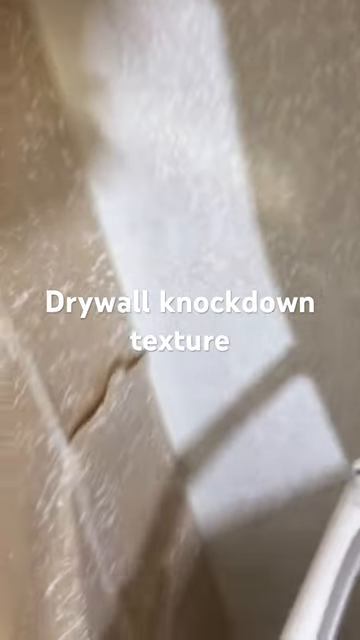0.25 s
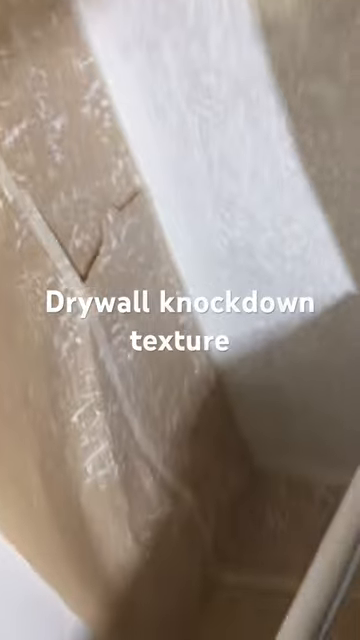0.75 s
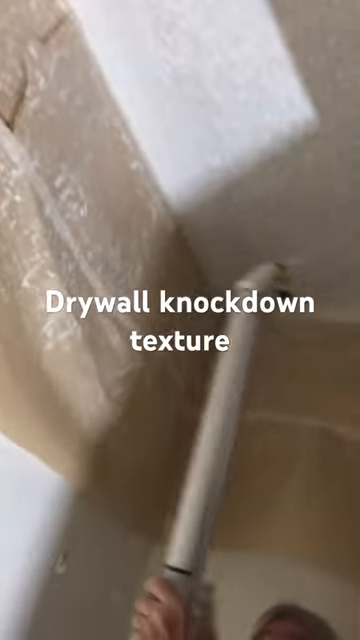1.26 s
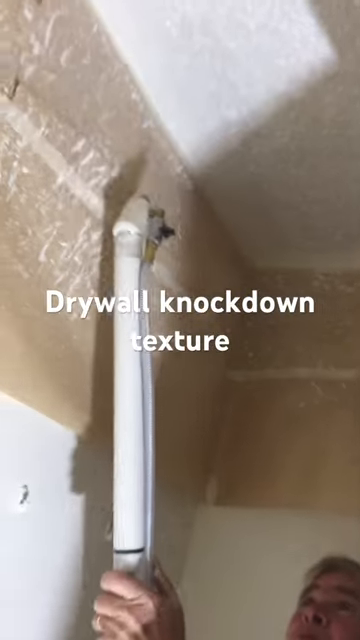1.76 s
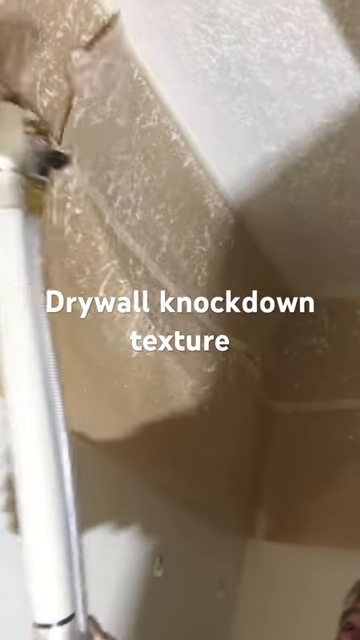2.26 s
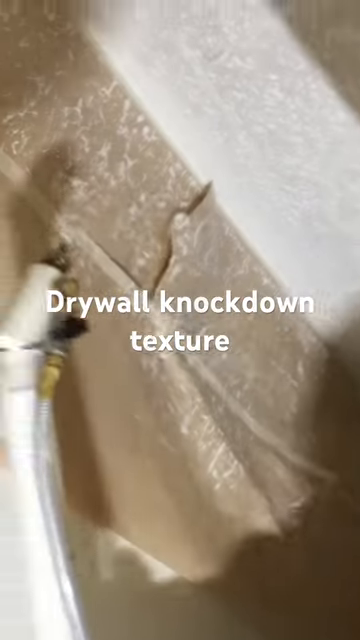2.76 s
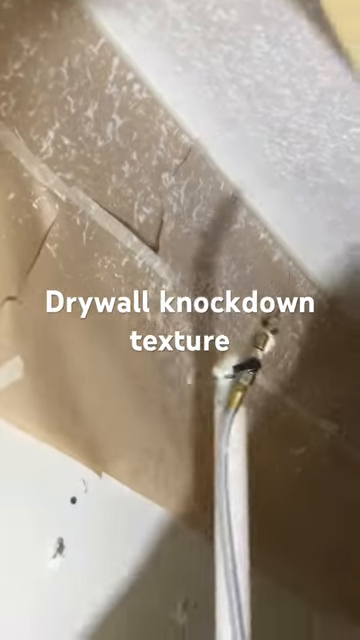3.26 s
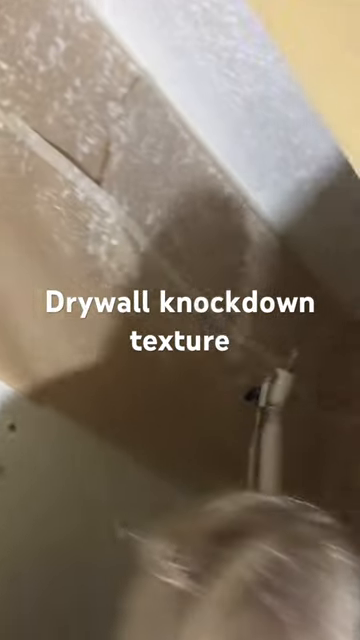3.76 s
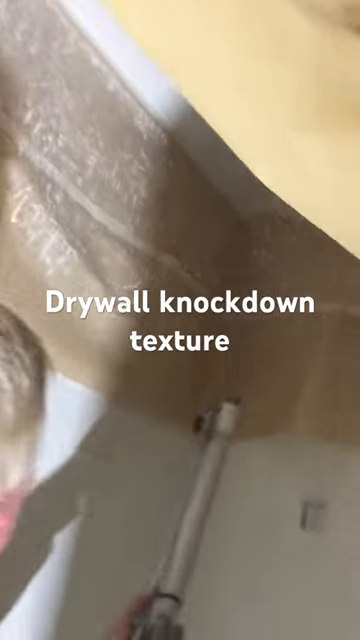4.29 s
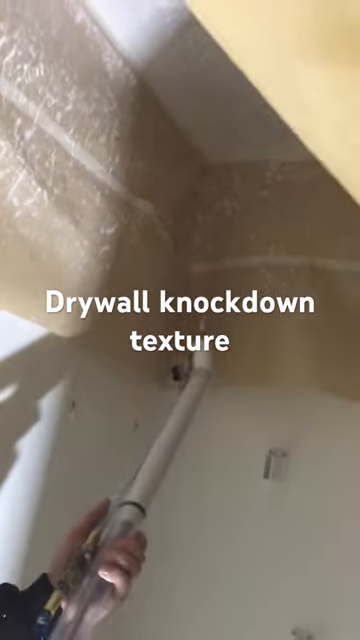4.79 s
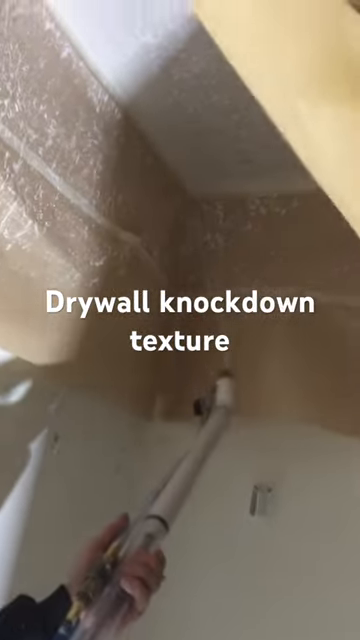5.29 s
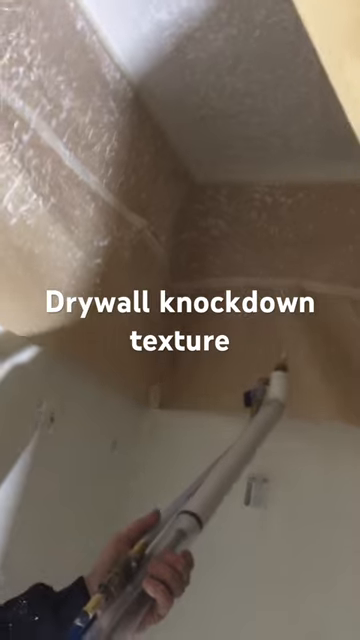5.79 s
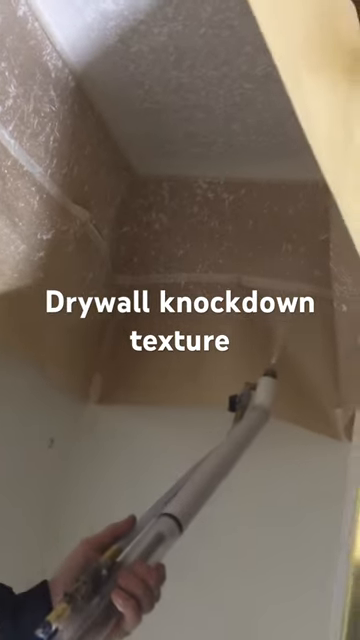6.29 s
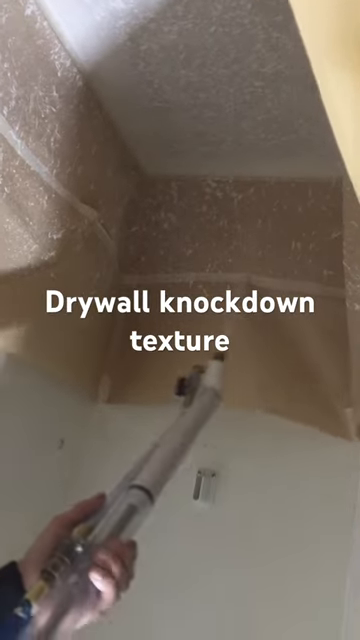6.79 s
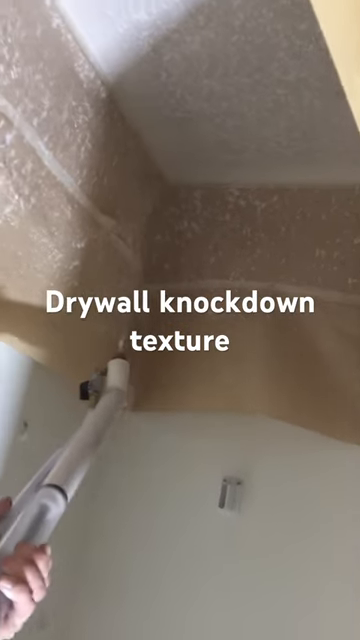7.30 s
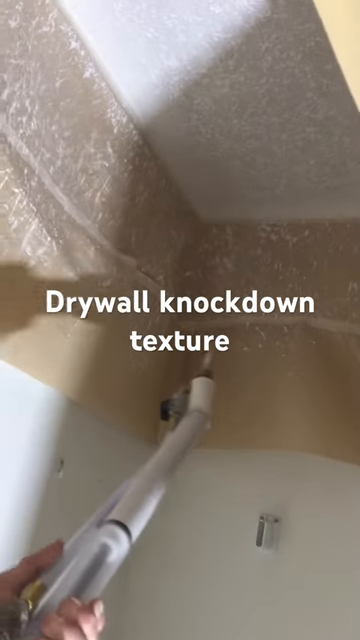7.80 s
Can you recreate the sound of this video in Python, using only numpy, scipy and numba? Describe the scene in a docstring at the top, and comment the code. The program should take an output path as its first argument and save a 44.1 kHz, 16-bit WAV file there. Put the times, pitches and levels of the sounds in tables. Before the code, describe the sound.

A compressed-air texture gun sprays without a break in a small bare room: bright hiss, midrange roar and thin wavering whistles, all fluttering quickly. Mud droplets splatter on the ceiling and patter on masking paper, lighter in the middle, then drumming and booming more in the last part. One dull bump and one sharp slap stand out slightly. Close handheld microphone, mono.

```python
"""A compressed-air texture gun sprays drywall mud on a ceiling edged with masking paper, in a bare room.
Filtered noise makes the jet: hiss, roar, whistle and wandering tones flutter as mud feeds in, with spits and a hoot.
Random impacts make the droplets that splatter on the ceiling and drum on the paper, which flaps in the blast;
lumps slap it and the wand bumps the ceiling, as fading modes with noise. Drifting sines over a dull rumble
make a far compressor. The mix is mono, alike in both channels."""
import sys
import numpy as np
from scipy import signal
from scipy.fft import rfft, irfft, next_fast_len
from scipy.io import wavfile
from scipy.ndimage import uniform_filter1d, map_coordinates
from numba import njit

SR = 44100
rng = np.random.default_rng(int(sys.argv[2]) if len(sys.argv) > 2 else 0)


def int16_out(signal):
    """Quantize to a 16-bit WAV file."""
    q = np.round(np.clip(np.atleast_2d(signal).T, -1, 1) * 32767)
    wavfile.write(sys.argv[1], SR, q.astype(np.int16))


N = 355005
TIME = np.arange(N) / SR
FREQ = np.maximum(np.arange(N // 2 + 1) * SR / N, 1)  # kept above zero for the logarithm


def undb(db):
    """Decibels to gain."""
    return 10 ** (np.asarray(db) / 20)


def unit(x):
    """Scale to an rms of one."""
    return x / np.sqrt(np.mean(x ** 2))


def curves(table):
    """The columns of a control table, joined by straight lines in time."""
    times, *columns = np.transpose(table)
    return [np.interp(TIME, times, column) for column in columns]


def slope(points):
    """Gain per frequency from (f/Hz, gain/dB) points, joined over log frequency."""
    hz, db = np.transpose(points)
    return undb(np.interp(np.log(FREQ), np.log(hz), db))


def bell(hz, width, freq=FREQ):
    """A bell over frequency that falls to one half at the edges of its width."""
    return .5 ** ((2 * (freq - hz) / width) ** 2)


def ripple(modes):
    """Gain of peaks and dips laid over a broad spectrum."""
    return undb(sum(db * bell(hz, width) for hz, width, db in modes))


def resonances(modes):
    """Gain of resonances that stand alone; their powers add."""
    return np.sqrt(sum(undb(db) ** 2 * bell(hz, width) for hz, width, db in modes))


def colour(x, gain):
    """Filter by a gain per frequency; rms one."""
    size = next_fast_len(N, real=True)
    bins_hz = np.arange(size // 2 + 1) * SR / size
    spectrum = rfft(x, size) * np.interp(bins_hz, FREQ, gain)
    return unit(irfft(spectrum, size)[:N])


def noise(gain):
    """Coloured turbulence noise; rms one."""
    return colour(rng.standard_normal(N), gain)


def walk(rate):
    """Smooth chance that changes about rate times a second; rms one."""
    steps = rng.standard_normal(4096)
    path = np.interp(TIME * rate, np.arange(len(steps)), steps)
    return unit(uniform_filter1d(path, max(int(SR / rate / 2), 1)))


def swell(s, length):
    """A rounded burst around time s, half as high at the edges of its length."""
    return np.interp(TIME, s + length * np.linspace(-1, 1, num=17), np.hanning(17))


def drops(per_s, spread_db):
    """Random impacts; a wider spread makes a few of them much larger than the rest."""
    hit = rng.random(N) < per_s / SR
    boost_db = spread_db * np.minimum(rng.exponential(size=N), 4)
    return hit * rng.standard_normal(N) * undb(boost_db)


@njit
def resonator(x, hz, width):
    """State-variable band-pass with a moving centre."""
    out, band, low = np.empty(len(x)), 0., 0.
    for i in range(len(x)):
        g = np.tan(np.pi * hz[i] / SR)
        damping = width / hz[i]
        v = (band + g * (x[i] - low)) / (1 + g * (g + damping))
        band = 2 * v - band
        low = low + 2 * g * v
        out[i] = damping * v
    return out


def tone(hz, width_hz, wobble):
    """Turbulence through a steep resonance whose centre wobbles about a course; rms one."""
    centre = np.clip(hz * (1 + wobble * walk(12)), 1000, 12000)
    once = resonator(rng.standard_normal(N), centre, float(width_hz))
    return unit(resonator(once, centre, float(width_hz)))


def ring(modes, age):
    """Struck modes (f/Hz, t60/s, level/dB) that start together, each at a random phase, and fade."""
    return sum(np.sin(2 * np.pi * (hz * age + rng.random())) * undb(db - 60 * age / t60)
               for hz, t60, db in modes)


def compressor(rumble_db=-42.5, drift=0.0018):
    """A far machine: lines that drift together with its speed, over a dull rumble."""
    # rumble spectrum: f/Hz, gain/dB
    rumble_slope = [(20, -45), (33, -26), (44, -3), (58, -5), (80, -3), (120, -2.5), (170, -10), (400, -16),
                    (1000, -20.5)]
    # course of the machine's hum: t/s, level/dB
    motor_course = [(0, -46), (2.3, -43.5), (3, -47), (4.6, -48.5), (5.4, -46), (8.05, -46)]
    # hum lines: f/Hz, level against the course/dB
    hum_lines = [(41.2, -21), (70, -17), (82.2, -3.5), (110, 2.5), (141, -19)]
    # a higher hum line, fairly steady at first, sinking away mid-way and partly returning: t/s, level/dB
    upper_course, upper_hz = [(0, -47), (2.7, -46.5), (2.9, -60), (4.6, -63), (5, -54), (8.05, -52)], 216
    motor_db, = curves(motor_course)
    turns = np.cumsum(1 + drift * walk(2.93)) / SR  # time stretched by the speed
    lines = [(hz, motor_db + db) for hz, db in hum_lines]
    lines.append((upper_hz, curves(upper_course)[0]))
    hum = sum(np.sqrt(2) * undb(db) * np.sin(2 * np.pi * (hz * turns + rng.random())) for hz, db in lines)
    return hum + undb(rumble_db) * noise(slope(rumble_slope))


def room(x, t60=0.22, wet_db=-8):
    """Bare walls add a short dense tail of decaying noise."""
    age = TIME[:SR // 2]
    tail = rng.standard_normal(len(age)) * undb(-60 * age / t60) * (age > .005)
    wet = signal.fftconvolve(x, tail / np.linalg.norm(tail))[:N]
    return (x + undb(wet_db) * wet) / np.hypot(1, undb(wet_db))


def wall_echoes(x, sway_s=0.0003026, echo_db=-15.0, count=8):
    """Ceiling and walls return the jet; each path shifts as the wand sweeps, so the hiss changes colour."""
    out = x
    for path_s in rng.uniform(.001, .014, count):
        lag = path_s + sway_s * walk(1.2)
        out = out + undb(echo_db) * map_coordinates(x, [(TIME - lag) * SR], order=3)
    return out / np.sqrt(1 + count * undb(echo_db) ** 2)  # the paths share the jet's power


def taps(thud_db=-7, thud_t60=0.096):
    """The head of the wand bumps the ceiling: a dull thud, and its tube rings on."""
    # bumps: t/s, level/dB
    bumps = [(2.674, -22)]
    # ring of the wand: f/Hz, t60/s, level/dB
    wand_modes = [(907, 0.29, -3.5), (938, .07, -3), (1355, .08, -4), (1502, .12, -6), (1600, .2, -7),
                  (1717, .12, -2)]
    age = TIME[:SR // 2]
    thud = noise(bell(hz=600, width=2000))
    out = np.zeros(N)
    for s, db in bumps:
        start = int(s * SR)
        span = slice(start, start + len(age))
        faded_thud = thud[span] * undb(thud_db - 60 * age / thud_t60)
        out[span] += undb(db) * (ring(wand_modes, age) + faded_thud)
    return out


def slaps(crack_db=2.0, crack_t60=0.026, spot_db_per_octave=-6):
    """A lump of mud hits the paper with a broad crack, a hard clack and a short hollow ring."""
    # lumps: t/s, level/dB, attack against the ring/dB, pitch that the struck spot favours f/Hz
    lumps = [(6.388, -13.5, -2, 845), (6.401, -16, -12, 330), (6.408, -17.5, -4, 500)]
    # hollow ring: f/Hz, t60/s, level/dB
    body_modes = [(150, .06, -8), (225, 0.17, -3), (330, 0.056, -13), (464, 0.078, -9), (660, 0.073, -8),
                  (825, 0.056, -3), (930, 0.06, -13), (1680, 0.05, -10)]
    # hard clack: f/Hz, t60/s, level/dB
    clack_modes = [(2940, .04, -6), (3400, .025, -1), (3750, 0.02, 1), (3960, .03, 3), (4500, .02, -3),
                   (5490, 0.05, 0.5)]
    age = TIME[:SR // 4]
    crack = noise(bell(hz=3200, width=7500))
    out = np.zeros(N)
    for s, db, attack_db, spot_hz in lumps:
        start = int(s * SR)
        span = slice(start, start + len(age))
        # modes ring weaker with each octave away from the pitch of the struck spot
        body = [(hz, t60, mode_db + spot_db_per_octave * abs(np.log2(hz / spot_hz)))
                for hz, t60, mode_db in body_modes]
        faded_crack = crack[span] * undb(crack_db - 60 * age / crack_t60)
        attack = ring(clack_modes, age) + faded_crack
        out[span] += undb(db) * (ring(body, age) + undb(attack_db) * attack)
    return out


def membrane(x, wander=0.021, wander_per_s=4):
    """Drum modes of the hanging paper; the blast tightens and slackens it, so each wanders in pitch."""
    # drum modes: f/Hz, width/Hz, level/dB
    drum_modes = [(113.6, 22, -4.5), (151, 26, 0), (172, 17, -3.5), (215.4, 18, 3.5), (232, 27, 1),
                  (300, 30, -4)]
    out = 0
    for hz, width, db in drum_modes:
        centre = hz * np.exp(wander * walk(wander_per_s))
        once = resonator(x, centre, float(width))
        out = out + undb(db) * resonator(once, centre, float(width))
    return unit(out)


def flaps():
    """The blast flaps the sheet: it booms in its drum modes, rustles and pushes a slow billow of air."""
    # flaps: t/s, boom level/dB, billow level/dB, rustle level/dB, length/s
    flap_events = [(1.733, -37, -56, -38, .06), (2.276, -32, -54, -36, 0.048),
                   (3.993, -54, -58, -37.5, 0.055), (4.22, -34.5, -53, -37, 0.068),
                   (4.932, -26, -39, -33, 0.046), (5.014, -35, -35.5, -39, 0.11),
                   (5.147, -39, -52, -36, 0.037), (5.436, -39, -44, -36, 0.075),
                   (5.932, -31, -56, -44, 0.034), (6.084, -31, -54, -39, .078),
                   (6.408, -31.5, -57, -36, 0.045), (7.148, -31, -56, -41, 0.049),
                   (7.573, -52, -40, -50, 0.26)]
    # billow spectrum: f/Hz, gain/dB
    billow_slope = [(20, -50), (32, -24), (44, 7), (70, -8), (110, -5), (250, -25), (600, -37)]
    boom = membrane(rng.standard_normal(N))
    billow = noise(slope(billow_slope))
    rustle = colour(drops(per_s=2500, spread_db=0.0), bell(hz=406, width=800))
    out = np.zeros(N)
    for s, boom_db, billow_db, rustle_db, length in flap_events:
        sheet = boom * undb(boom_db) + billow * undb(billow_db) + rustle * undb(rustle_db)
        out += sheet * swell(s, length)
    return out


def flutter(hz=38, width_hz=46):
    """The quick uneven throb of mud entering the air stream; rms one."""
    return noise(bell(hz, width_hz))


def landing(clump_db=0.86, clumps_per_s=7):
    """Droplets splatter on the ceiling; on the hanging paper they patter, crackle and ring its drum modes."""
    # aim of the spray, off the paper in the middle: t/s, drumming level before trim/dB
    aim_course = [(0, -34), (0.7, -34.5), (1.25, -36), (1.8, -35), (2.3, -36), (2.52, -37.5), (2.62, -48),
                  (2.7, -41), (2.82, -49), (3.1, -48.5), (3.33, -43), (3.75, -49.5), (4.1, -43.5),
                  (4.4, -46), (4.66, -44.5), (4.72, -34.5), (5.2, -32.5), (5.65, -36), (6.2, -32.5),
                  (7.1, -34), (8.05, -35)]
    # mud landing on the bare ceiling: t/s, splatter level before trim/dB
    ceiling_course = [(0, -32.5), (0.9, -31), (1.3, -37.5), (1.8, -34), (2.8, -38), (3.8, -41), (4.6, -43),
                      (4.78, -35), (5.6, -38), (7.1, -35), (8.05, -36)]
    # slack paper in the corner booms more than taut paper: t/s, boom against the patter/dB
    slack_course = [(0, -22), (2.6, -12), (4.6, -10), (4.9, -1.5), (6.3, -1), (8.05, -1)]
    # spectra of patter, finest droplets and splatter: f/Hz, gain/dB
    patter_slope, crackle_slope, splatter_slope = [(40, -32), (80, -6), (120, 3.5), (155, 0), (192, -3),
                                                   (225, 1.5), (268, -5), (303, 2.5), (365, -2), (420, 0.5),
                                                   (465, -6), (500, 0.5), (640, -0.5), (900, -12),
                                                   (2000, -47)], [(900, -17.5), (2000, 3), (4300, 1),
                                                                  (4950, -1), (5500, 6), (8400, 2),
                                                                  (10000, 0), (15000, -16)], [(250, -13), (500, -19),
                                                                                   (700, -1.5), (850, 2),
                                                                                   (1100, 1), (1300, 1),
                                                                                   (1700, 0.5), (3500, -38)]
    # the mud arrives in clumps, which swell both surfaces together
    clumps = clump_db * walk(clumps_per_s)
    drum_db = curves(aim_course)[0] + clumps
    splatter_db = curves(ceiling_course)[0] + clumps
    boom_gain = undb(curves(slack_course)[0])
    patter = colour(drops(per_s=3000, spread_db=2.0), slope(patter_slope))
    boom = membrane(drops(per_s=2000, spread_db=2.0))
    drum = (patter + boom_gain * boom) / np.hypot(1, boom_gain)
    # the finest droplets arrive in dense gusts
    crackle = colour(drops(per_s=14000, spread_db=2.0), slope(crackle_slope)) * undb(3.65 * flutter())
    splatter = colour(drops(per_s=3000, spread_db=2.0), slope(splatter_slope))
    paper = drum * undb(drum_db + 0.5) + crackle * undb(drum_db + 5.5)
    return paper + splatter * undb(splatter_db + 1.0)


def gap_hoot():
    """Air escaping between nozzle and ceiling hoots; the pitch slides with the width of the gap."""
    # hoot with the gun close to the ceiling: t/s, centre f/Hz, level/dB
    gap_course = [(0, 1730, -37), (2.55, 1760, -40), (2.7, 1640, -32), (2.92, 1550, -32), (3.08, 1400, -33),
                  (3.22, 1450, -41), (3.42, 1740, -32), (3.75, 1820, -41), (4.1, 1850, -50),
                  (4.7, 1840, -35), (5, 1890, -47), (8.05, 1890, -41)]
    hz, db = curves(gap_course)
    return tone(hz, width_hz=320, wobble=0.034) * undb(db + 2.3 * walk(25))


def spits(count=6, width_share=0.087):
    """Air forces its way past mud in chirps and short whistles: bands of noise, set ones and random strays."""
    # mud half blocks the nozzle and it sings: t/s, centre f/Hz, level/dB, length/s
    set_spits = [(0.62, 2800, -31, .04), (1.153, 2800, -21, 0.022), (1.42, 11600, -21, 0.055),
                 (1.784, 1280, -29.5, .1), (1.796, 10900, -22, 0.039), (1.99, 11200, -20, .027),
                 (2.262, 8250, -26, 0.091), (2.76, 11200, -21, 0.034), (1.75, 4650, -33, .5),
                 (2.85, 880, -40, .35), (3, 10950, -26, 0.18), (3.402, 820, -39, 0.2),
                 (3.4, 4450, -36, 0.63), (3.433, 3030, -25, 0.038), (4.08, 11600, -17, .014),
                 (4.328, 11300, -21, 0.059), (4.727, 10850, -25, 0.13), (5.2, 5460, -36, .2),
                 (5.24, 3500, -27, .04), (5.65, 4550, -29, 0.092), (5.74, 3240, -19, 0.016),
                 (6.142, 11100, -18, .014), (6.23, 11000, -25, .13), (6.845, 1880, -32, 0.19),
                 (7.22, 7900, -30, .16), (7.897, 1480, -34, 0.27), (7.983, 11400, -22, .025)]
    stray_db, stray_s, low_hz, high_hz = -30, 0.091, 1700, 7460
    strays = [(when * N / SR, low_hz * (high_hz / low_hz) ** pitch, stray_db, stray_s)
              for when, pitch in rng.random((count, 2))]
    out = np.zeros(N)
    freq = np.arange(SR // 2 + 1)
    for s, hz, db, length in strays + set_spits:
        band = np.sqrt(bell(hz, width_share * hz, freq))
        second = unit(irfft(rfft(rng.standard_normal(SR)) * band))  # one second of noise, looped below
        out += np.resize(second, N) * undb(db) * swell(s, length)
    return out


def beaming(x, count=12):
    """The jet throws each treble band another way, so the bands swell and fade as the wand moves."""
    centres, spacing = np.linspace(4000, 12500, num=count, retstep=True)
    spectrum, out = rfft(x), x
    for hz in centres:
        swing_db = 0.8 * walk(2.2)
        band = irfft(spectrum * bell(hz, spacing), N)
        out = out + band * (undb(swing_db) - 1)
    return out


def jet(feed_db=0.28, grain_db=0.95):
    """Turbulent air in the nozzle; the uneven feed of mud makes all its parts flutter together."""
    # the wand swings nearer and further: t/s, hiss level before trim/dB, roar level before trim/dB
    swing_course = [(0, -19, -22.5), (0.55, -19.5, -22.5), (1.2, -18.5, -22.5), (2.4, -17.5, -22.5),
                    (3.5, -18.5, -25), (4.1, -18.5, -24), (4.75, -17.5, -22.5), (6.3, -18.5, -22.5),
                    (8.05, -17.5, -23)]
    # nozzle resonances and the dips between them: f/Hz, width/Hz, gain/dB
    nozzle_modes = [(1900, 270, 1), (4610, 490, 2.5), (4940, 320, -4), (5670, 510, -2), (6840, 710, 3),
                    (7910, 340, -6), (9050, 1840, 4.5), (10140, 790, -3), (12800, 900, 0),
                    (13900, 1200, 3.7), (15300, 400, 5)]
    # spectra: f/Hz, gain/dB
    hiss_slope, roar_slope = [(1500, -32), (3500, -11), (5000, 1.5), (8000, 2), (12000, 3), (16000, -.5)], [(200, -29), (600, -22), (1100, -6), (1600, -1.5), (2400, 3),
                                            (3600, 2.5), (4400, -1), (5500, -12.5), (9000, -17)]
    # cavity tone, following the mud in the opening: t/s, centre f/Hz, level against the roar before trim/dB
    cavity_course = [(0, 3000, -8), (.2, 2820, -4), (.4, 2930, -8), (.6, 2800, -7), (1.15, 2850, -7),
                     (1.3, 3040, -4), (1.42, 2950, -15), (1.68, 3000, -9), (2.05, 2980, -5),
                     (2.6, 2940, -8.5), (3.4, 2910, -4), (4.1, 2900, -10), (4.64, 2800, -9),
                     (4.92, 2870, -3.5), (5.2, 2950, -10.5), (5.5, 3100, -5.5), (5.8, 3250, -5),
                     (5.96, 2950, -8), (6.6, 2950, -9), (7.1, 2950, -6.5), (7.64, 2850, -13),
                     (8.05, 2900, -5.5)]
    # higher tone at the tip, shifting as the gun turns: t/s, centre f/Hz, level against the hiss before trim/dB
    tip_course = [(0, 6800, -12), (1, 6650, -18), (1.9, 6570, -16), (2.3, 6800, -10), (2.9, 6930, -14),
                  (3.33, 6950, -12), (3.6, 7300, -12), (3.95, 7060, -20), (4.4, 6800, -15.5),
                  (8.05, 6960, -21)]
    # whistle of the air orifice: f/Hz, width/Hz, level/dB
    orifice_modes = [(10930, 240, 0), (11430, 530, -0.5)]
    hiss_db, roar_db = curves(swing_course)
    cavity_hz, cavity_db = curves(cavity_course)
    tip_hz, tip_db = curves(tip_course)
    nozzle = ripple(nozzle_modes)
    hiss = beaming(noise(slope(hiss_slope) * nozzle)) * undb(hiss_db - 1.22 + .5 * flutter())
    roar = noise(slope(roar_slope) * nozzle) * undb(roar_db - 1.02 + 0.32 * flutter())
    # mud narrows and frees the opening, so the tones wobble and come in bursts
    cavity = tone(cavity_hz, width_hz=370, wobble=0.022)
    cavity = cavity * undb(roar_db + cavity_db - .5 + 2.04 * walk(30))
    tip = tone(tip_hz, width_hz=520, wobble=0.016)
    tip = tip * undb(hiss_db + tip_db - 1 + 1.6 * walk(15))
    # the whistle sits 7 dB under the hiss course, with slow surges and a quick tremble
    whistle_db = hiss_db - 7 + 0.8 * walk(6)
    whistle = noise(resonances(orifice_modes)) * undb(whistle_db + 1.0 * walk(60))
    shared_db = feed_db * flutter() + grain_db * walk(350)
    return (hiss + roar + cavity + tip + whistle) * undb(shared_db)


def scene():
    """Compressor, paper, ceiling and gun mixed to mono, alike in both channels."""
    surfaces = room(landing() + slaps() + taps())
    gun = wall_echoes(jet() + spits() + gap_hoot())
    mono = compressor() + flaps() + surfaces + gun
    return np.array([mono, mono])


def record(dry, low_hz=36, top_hz=15750):
    """The recorder sheds the deepest bass and cuts the top steeply."""
    bass_cut = signal.butter(6, low_hz, "highpass", fs=SR, output="sos")
    top_cut = signal.ellip(12, .1, 80, top_hz, fs=SR, output="sos")  # ripple and stop-band depth in dB
    return signal.sosfilt(top_cut, signal.sosfilt(bass_cut, dry))


dry = scene()
out = record(dry)
int16_out(out)
```